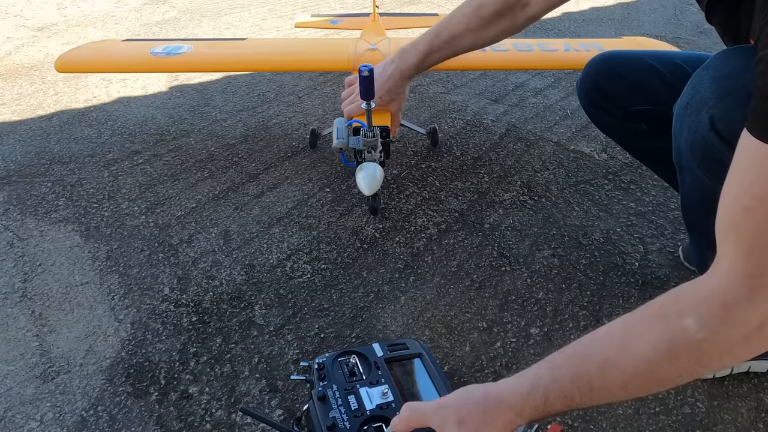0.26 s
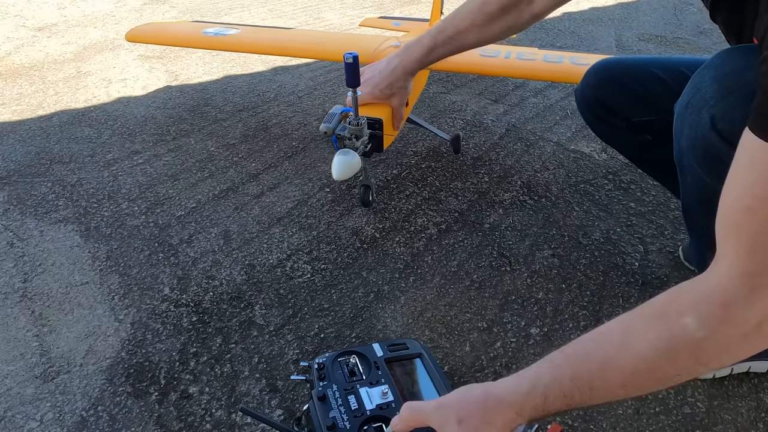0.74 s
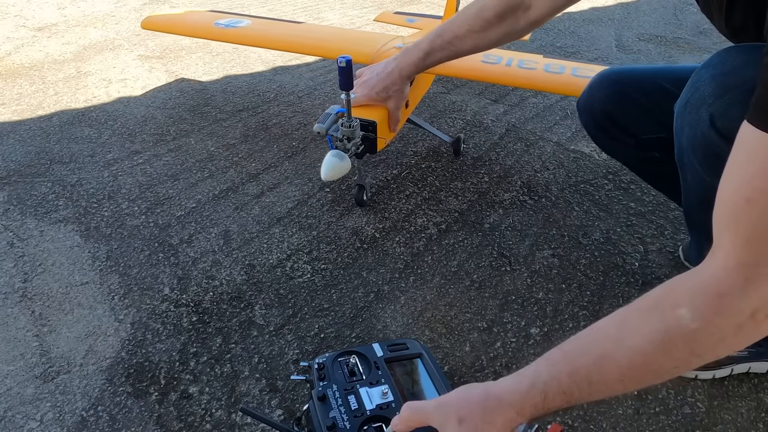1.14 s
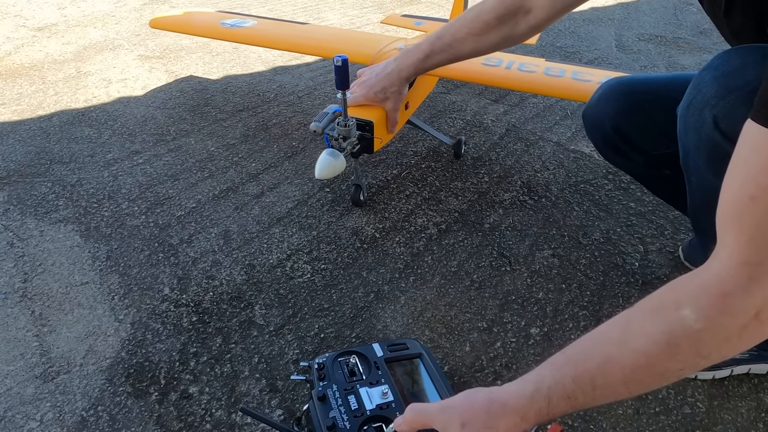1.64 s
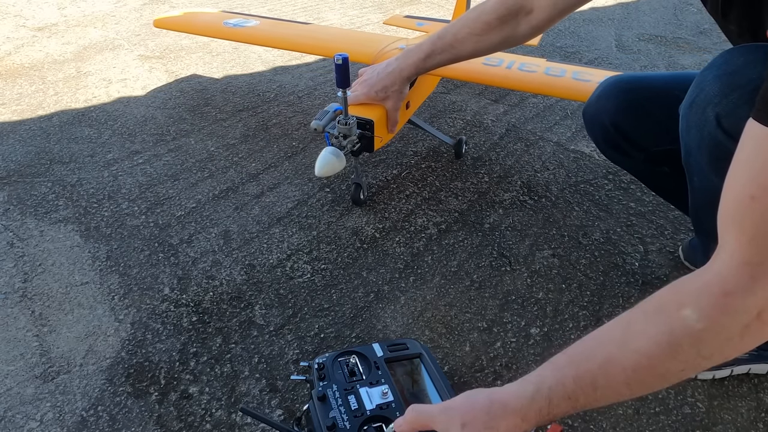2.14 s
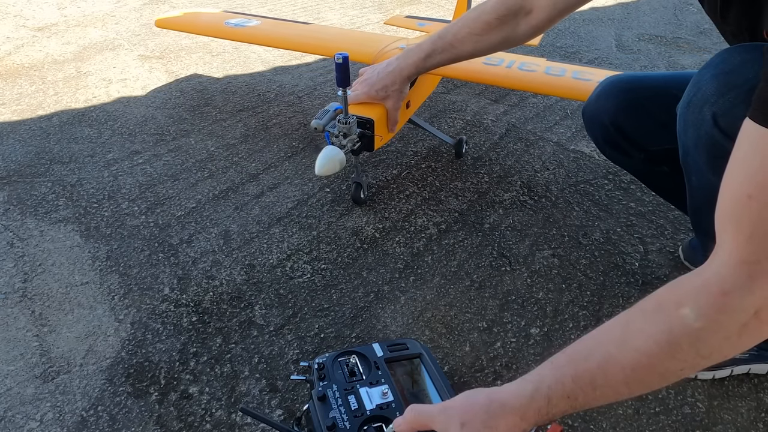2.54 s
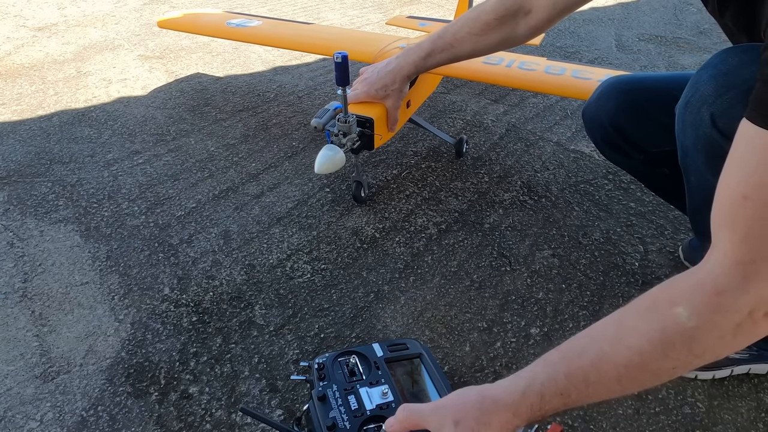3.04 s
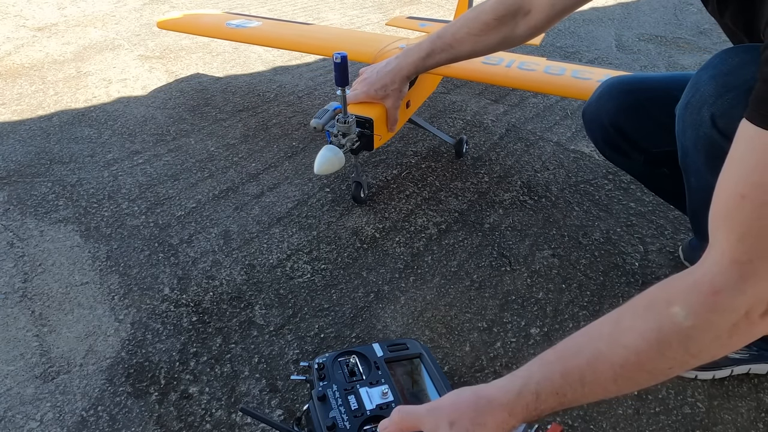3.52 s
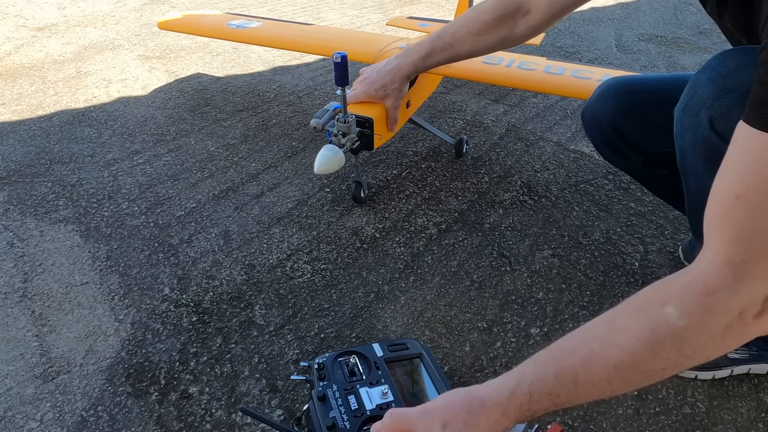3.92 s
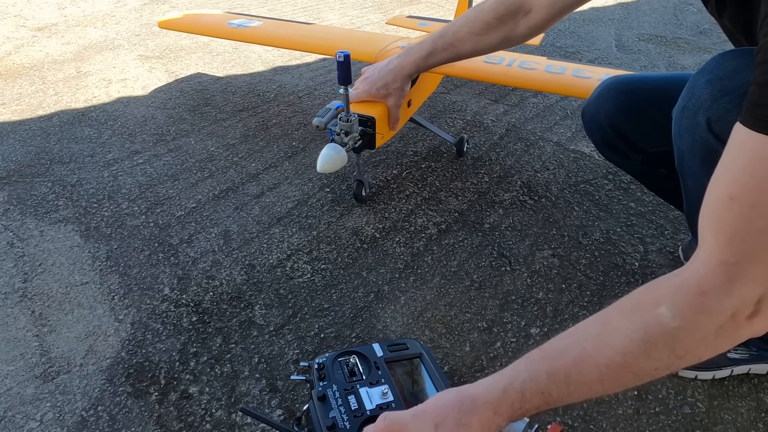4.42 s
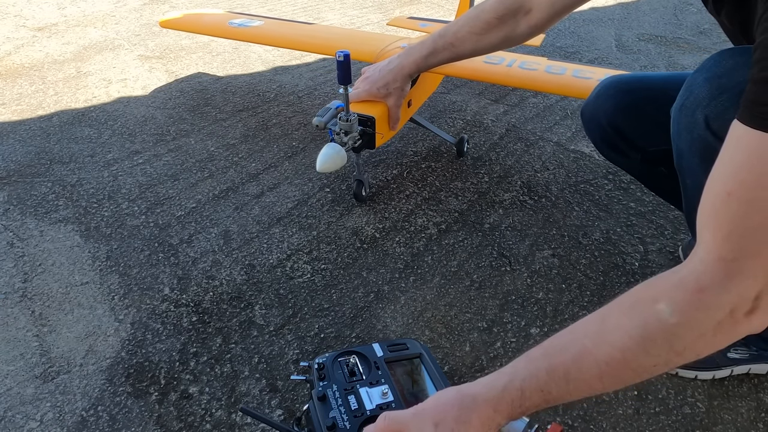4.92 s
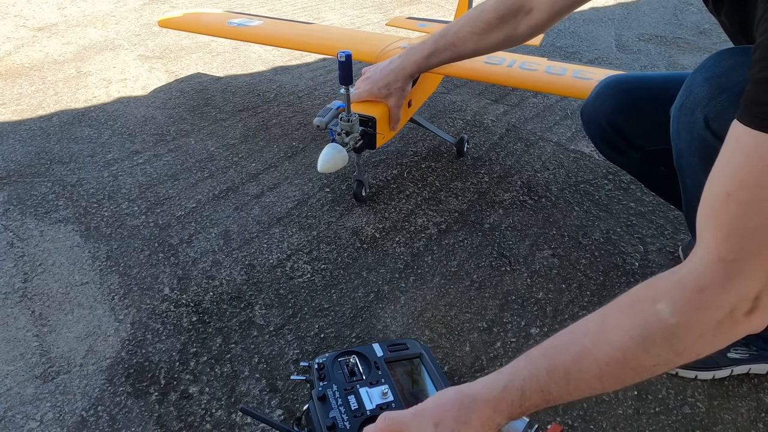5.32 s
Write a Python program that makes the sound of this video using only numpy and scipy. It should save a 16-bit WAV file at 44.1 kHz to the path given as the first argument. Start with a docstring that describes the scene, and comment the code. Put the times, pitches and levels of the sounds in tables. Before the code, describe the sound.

Close outdoors, a tiny engine turns over with a steady whir and scattered pops, fires up, revs sharply, then drops to an uneven buzzing idle.

```python
"""Outdoors on asphalt, a small two-stroke model airplane engine is started close by.
It spins with a steady whir and fires on scattered turns; then it catches, races up and
settles into a rich idle on which every other firing is weak. Firings are struck resonances and
filtered pulses timed by one crank; whir and propeller wash are shaped noise. The propeller
chops the air twice a turn."""
import sys
import numpy as np
from scipy import signal
from scipy.fft import rfft, irfft
from scipy.io import wavfile

SR = 44100
rng = np.random.default_rng(int(sys.argv[2]) if len(sys.argv) > 2 else 0)


def unload_audio(sound):
    """Save the sound as a 16-bit wav file, at the path given as the first command line argument."""
    columns = np.transpose(np.atleast_2d(sound))
    # keep every value between -1 and 1, then stretch to whole-number steps
    steps = np.round(np.clip(columns, -1, 1) * 32767)
    wavfile.write(sys.argv[1], SR, steps.astype(np.int16))


N = 245637
TIME, FREQ = np.arange(N) / SR, np.fft.rfftfreq(N, 1 / SR)
CATCH_S, THROTTLE_BACK_S = 2.862, 4.255

# crank speed from the catch on: [time_s, speed_turns_per_s]
CRANK_SPEED = [(2.862, 78), (2.99, 94.8), (3.12, 117), (3.2, 130.5), (3.28, 141.2), (3.45, 154.8),
               (3.53, 157.5), (3.61, 163.2), (3.64, 163.5), (3.89, 173.7), (3.92, 173.1), (4.09, 180.3),
               (4.16, 182.5), (4.24, 182.5), (4.56, 167.8), (4.7, 169.3), (4.97, 170.8), (5.06, 167.3),
               (5.17, 169.6)]
# lone firings while spinning: [start_s, level_db]
LONE_FIRINGS = [(0.0392,-13.5), (0.0795,-13.5), (0.093,-13.5), (0.144,-14), (0.1832,-14.5), (0.2348,-13),
                (0.273,-14), (0.287,-14), (0.339,-12), (0.3754,-16.6), (0.3896,-12.5), (0.4397,-14),
                (0.491,-15), (0.5424,-14.5), (0.5808,-13), (0.594,-14), (0.6443,-15), (0.6704,-15.5),
                (0.6963,-12.2), (0.7489,-12.5), (0.802,-13.5), (0.8414,-14.5), (0.881,-11.5),
                (0.8948,-15.5), (0.9332,-18), (0.9468,-12.5), (1.011,-14.5), (1.025,-16), (1.078,-13.5),
                (1.1325,-14), (1.1863,-11.7), (1.2241,-16), (1.251,-13), (1.3034,-12.5), (1.342,-13.5),
                (1.355,-19), (1.3809,-13.5), (1.407,-16), (1.458,-11.5), (1.5094,-11.5), (1.5604,-13),
                (1.6,-13), (1.6519,-13), (1.6921,-16), (1.704,-14), (1.7565,-13), (1.796,-14.5),
                (1.8235,-13.5), (1.8763,-12), (1.9306,-11.5), (1.9718,-19), (1.9843,-12.5), (2.037,-12),
                (2.0913,-11), (2.1446,-12.5), (2.1711,-16), (2.2245,-13.5), (2.278,-12.5), (2.3315,-12),
                (2.3712,-19.5), (2.3847,-13), (2.423,-14), (2.463,-14.5), (2.5274,-15.5), (2.5413,-12.5),
                (2.581,-14.7), (2.6076,-13.5), (2.6607,-12.5), (2.7012,-12.5), (2.7147,-15), (2.7686,-13.5),
                (2.8092,-18), (2.8223,-13.5)]
# exhaust pulse spectrum: [freq_hz, gain_db]
EXHAUST_SPECTRUM = [(100, -73.5), (300, -46), (520, -28), (950, -25), (1200, -5), (1550, 6), (1880, -0.5),
                    (2600, 1.5), (3400, -1), (5600, -14), (9000, -26.5), (15500, -31)]
# chopped air and gas spectrum: [freq_hz, gain_db]
CHOP_SPECTRUM = [(200, -69), (600, -40), (1200, -26.5), (2200, 0.5), (3400, 4.5), (4600, 1), (5700, -2.5),
                 (7400, -6), (8700, -6), (13000, -24), (15500, -34)]


def amp(db):
    """Decibels to gain."""
    return 10 ** (np.asarray(db) / 20)


def unit(x):
    """Scales to an rms of one."""
    return x / np.sqrt(np.mean(x ** 2) + 1e-20)


def at(rows, s, axis=1):
    """Reads one column of a curve at the times s."""
    rows = np.asarray(rows)
    return np.interp(s, rows[:, 0], rows[:, axis])


def read(points, hz):
    """Reads a spectrum on a log-frequency axis."""
    f, value = np.transpose(points)
    return np.interp(np.log(hz + 1), np.log(f), value)


def add(mix, s, sound):
    """Mixes a sound in at time s."""
    part = mix[max(round(s * SR), 0):][:len(sound)]
    part += sound[:len(part)]


def high_pass(x, hz, order):
    """Steep cut below hz."""
    return signal.sosfilt(signal.butter(order, hz, "high", fs=SR, output="sos"), x)


def colour(x, db):
    """Causal minimum-phase filter with the gain db at each frequency."""
    log_gain = np.log(amp(np.r_[db, db[:0:-1]]))
    response = np.exp(np.conj(signal.hilbert(log_gain)))[:len(FREQ)]
    taps = irfft(response, N)[None, :4096]
    return signal.oaconvolve(np.atleast_2d(x), taps, axes=1)[:, :N]


def pulses(times, sizes):
    """Band-limited clicks at exact times."""
    out = np.zeros(N)
    index = np.round(times * SR).astype(int)[:, None] + np.arange(-8, 9)
    offset = index - times[:, None] * SR
    click = np.sinc(offset) * np.cos(offset * np.pi / 18) ** 2
    np.add.at(out, np.clip(index, 0, N - 1), sizes[:, None] * click)
    return out


def mode(times, sizes, hz, decay_s, cut_hz=1340):
    """One decaying resonance, struck at the given times, each time at its own pitch."""
    out = np.zeros(N)
    for s, size, f in zip(times, sizes, hz * np.ones(len(times))):
        t = np.maximum(np.arange(SR // 50) / SR + round(s * SR) / SR - s, 0)
        envelope = np.exp(-t / decay_s) * (1 - np.exp(-t * f / 2)) ** 2
        add(out, s, size * envelope * np.sin(2 * np.pi * f * t))
    return high_pass(out, cut_hz, order=4)


def wander(top_hz):
    """Slow random curve of rms one, mostly below top_hz."""
    size = 2048
    hz = np.fft.rfftfreq(size, N / SR / size)
    slow = irfft(rfft(rng.standard_normal(size)) * (hz > .5) / (1 + (hz / top_hz) ** 4))
    return unit(np.interp(TIME, np.linspace(0, N / SR, size), slow))


def richness(s):
    """Share that every other firing loses to a rich mixture at the times s."""
    # weakening by rich mixture: [time_s, share_lost_0_1]
    rich_curve = [(2.98, 0.32), (3.0, 0.7), (3.1, 0.63), (3.2, 0), (3.5, 0), (4.17, 0.18), (4.28, 0.62),
                  (4.6, 0.72)]
    return np.clip(at(rich_curve, s), 0, 1) * (s >= CATCH_S)


def level(law, s, idle_turns_per_s=170):
    """Gain of a layer at the times s, from crank speed and mixture."""
    spinning_db, rise_db, power, rich_db = law
    catch_turns_per_s = CRANK_SPEED[0][1]
    rev = (at(CRANK_SPEED, s) - catch_turns_per_s) / (idle_turns_per_s - catch_turns_per_s)
    rev = np.maximum(rev, 0)
    return amp(spinning_db + rise_db * rev ** abs(power) + rich_db * richness(s))


def crank(surge_turn=0.006, surge_at=0.17, spin_turns_per_s=76):
    """Turns counted from the catch; a rich crank hurries and lags on alternate turns."""
    # before the catch a whole number of turns lies between firings
    s = np.r_[np.array(LONE_FIRINGS)[:, 0], CATCH_S]
    count = np.r_[0, np.cumsum(np.round(np.diff(s) * spin_turns_per_s))]
    spinning = np.interp(TIME, np.r_[0, s], np.r_[-s[0] * spin_turns_per_s, count] - count[-1])
    turns = spinning + np.cumsum(at(CRANK_SPEED, TIME) * (TIME >= CATCH_S)) / SR
    return turns + surge_turn * richness(TIME) * np.sin(np.pi * (turns - surge_at))


def running(turns, uneven_db=0.0, jitter_s=.000015, intake_turn=.545, echo=0.6, echo_s=0.001005,
            sway_s=.00005):
    """An exhaust pulse on every turn and an intake pulse about half a turn later."""
    # intake pulse spectrum: [freq_hz, gain_db]
    intake_spectrum = [(300, -74.5), (650, -34), (1000, -12), (1250, -6.5), (1850, 5), (2600, -2.5),
                       (4200, -20), (6000, -17), (9000, -36), (15500, -78)]
    # layer gains: [spinning_db, rise_at_idle_db, rise_power, fully_rich_db]
    buzz_law = (-26.5, 0, 3, 0)
    intake_law = (-21.5, 11, 1, 15)
    ring_law = (-13.5, -2, -0.5, 3)
    count = np.arange(int(turns[-1]))
    chance = rng.standard_normal((len(count), 4))
    s = np.interp(count, turns, TIME)
    # the beat changes step as the throttle closes
    weak = richness(s) * (count % 2 == (s > THROTTLE_BACK_S))
    strength = (1 - weak) * amp(uneven_db * chance[:, 0])
    fired = s + jitter_s * chance[:, 1] + .00008 * weak  # weak firings leave the pipe later
    drawn = np.interp(count + intake_turn, turns, TIME) + jitter_s * chance[:, 2]
    # the pulse comes back once, its delay swaying slightly as the held plane shakes
    returned = fired + echo_s + sway_s * np.interp(s, TIME, wander(9.1))
    blows = pulses(fired, strength) + echo * pulses(returned, strength)
    exhaust = colour(blows, read(EXHAUST_SPECTRUM, FREQ))
    gulps = pulses(drawn, level(intake_law, s) * amp(chance[:, 3]))
    buzz = exhaust + colour(gulps, read(intake_spectrum, FREQ))
    buzz = buzz / buzz[:, TIME > CATCH_S].std() * level(buzz_law, TIME)
    return buzz + can(fired, strength) + muffler(fired, strength * level(ring_law, s))


def muffler(times, sizes, open_turn=0.1553, start_hz=2620, end_hz=2190, sag_s=0.0015, scatter=0.0065,
            overtone_db=-17, whistle_s=0.0013, split=0.032, close_s=0.00067, whistle_scatter=0.0071):
    """Each firing blows a short falling note while the port is open, then a whistle from the outlet."""
    # whistle, rising with hotter gas, sinking as the throttle closes; level against the note:
    # [time_s, pitch_hz, level_db]
    whistle_curve = [(2.8, 6080, -17), (2.9, 6080, -16.5), (3.05, 6280, -9.5), (3.3, 6420, -7),
                     (3.6, 6490, -9), (4.1, 6740, -9.5), (4.245, 6840, -8.5), (4.27, 6466, -11)]
    out = np.zeros(N)
    for s, size, chance in zip(times, sizes, rng.standard_normal((len(times), 4))):
        t = np.maximum(np.arange(400) / SR + round(s * SR) / SR - s, 0)
        hz = (end_hz + (start_hz - end_hz) * np.exp(-t / sag_s)) * (1 + scatter * chance[0])
        shut = np.maximum(t - open_turn / at(CRANK_SPEED, s), 0)
        port = (1 - np.exp(-(t / .0008) ** 2)) * np.exp(-shut / close_s)
        phase = 2 * np.pi * np.cumsum(hz * np.gradient(t))
        overtone = amp(overtone_db + 2 * chance[1]) * np.sin(1.633 * phase)
        note = port * (np.sin(phase) + overtone)
        age = t / whistle_s
        cycles = at(whistle_curve, s) * (1 + whistle_scatter * chance[2]) * t
        # with the throttle closed the whistle splits into two neighbouring tones
        beat = np.sin(2 * np.pi * split * cycles) if s > THROTTLE_BACK_S else 1
        whistle = age * np.exp(1 - age) * np.sin(2 * np.pi * cycles) * beat
        whistle_gain = amp(at(whistle_curve, s, axis=2) + 2 * chance[3])
        add(out, s, size * (note + whistle_gain * whistle))
    return high_pass(out, 550, order=4)


def can(times, sizes, upper_decay_s=0.0015, upper_drift=.03, settle_s=0.61):
    """Muffler can hums at its main mode under drifting upper ones; a lower one joins at idle."""
    # main mode, humming on between firings in hot gas: [time_s, pitch_hz, level_db]
    main_mode = [(3.1, 2170, -42), (3.3, 2230, -21), (3.55, 2210, -19), (3.8, 2200, -24), (4.15, 2200, -32),
                 (4.3, 2480, -26), (4.6, 2470, -46)]
    # upper mode rasping as the throttle opens: [time_s, pitch_hz, level_db]
    rasp = [(2.98, 3300, -34), (3.15, 3520, -9), (3.35, 3440, -20), (3.55, 3100, -45)]
    # upper modes, drifting with the gas: [centre_hz, level_db]
    upper_modes = [(2900, -29), (3500, -21.5), (4130, -16), (4520, -21), (4900, -39)]
    # upper mode gain: [spinning_db, rise_at_idle_db, rise_power, fully_rich_db]
    upper_law = (-17.5, 15, -0.3, 0.5)
    settled = np.clip((times - THROTTLE_BACK_S) / settle_s, 0, 1)
    out = mode(times, sizes * amp(at(main_mode, times, axis=2)), at(main_mode, times), decay_s=0.0035)
    rasp_sizes = sizes * amp(at(rasp, times, axis=2))
    out += mode(times, rasp_sizes, at(rasp, times), upper_decay_s, cut_hz=2000)
    for hz, db in upper_modes:
        drift = 1 + upper_drift * np.interp(times, TIME, wander(5.6))
        upper_sizes = sizes * level(upper_law, times) * amp(db)
        out += mode(times, upper_sizes, hz * drift, upper_decay_s, cut_hz=hz / 2)
    return out + mode(times, sizes * settled * amp(-24.5), hz=1843, decay_s=0.0036)


def sputter(thump_db=10.5, scatter=0.016, puff_db=-22, puff_hz=700, gas_db=-8, gas_s=0.0013, pop_db=0.43):
    """Lone firings: pressure step, low puff, spit of gas and a muffler ring slightly off in pitch."""
    s, db = np.transpose(LONE_FIRINGS)
    blows = pulses(s, amp(db))
    age = np.arange(SR // 50) / SR / gas_s
    spit = signal.oaconvolve(blows, age * np.exp(1 - age))[:N]
    gas = amp(gas_db) * colour(air() * spit, read(CHOP_SPECTRUM, FREQ))
    thump = amp(thump_db) * colour(blows, read(EXHAUST_SPECTRUM, FREQ))
    puff = mode(s, amp(db + puff_db), puff_hz, .5 / puff_hz, cut_hz=puff_hz)
    return muffler(s, amp(db + pop_db), scatter=scatter) + thump + puff + .5 * gas


def drone(turns):
    """Smooth low exhaust partials; half orders and a fuller middle come in while firings alternate."""
    # low partials: [crank_speed_multiple, level_db]
    whole_orders = [(1, -30), (3, -11), (4, -6.5), (5, 2.5)]
    # partials that come out when rich: [crank_speed_multiple, level_db]
    half_orders = [(3.5, -63), (4.5, -66), (5.5, -63), (7, -43.5), (8.5, -40), (9.5, -42)]
    # whole-order gain: [spinning_db, rise_at_idle_db, rise_power, fully_rich_db]
    drone_law = (-73, 17.5, 4, -19.5)
    whole = sum(amp(db) * np.sin(2 * np.pi * round(k) * turns) for k, db in whole_orders)
    half = sum(amp(db) * np.sin(np.pi * round(2 * k) * turns) for k, db in half_orders)
    half_gain = richness(TIME) * np.clip(TIME - CATCH_S, 0, 1)
    return (TIME > CATCH_S) * (level(drone_law, TIME) * whole + half_gain * half)


def propeller(turns, hiss_db=7.5, sharpness=2.3, between=1.0, lag_turn=0.093, slap_db=3.5,
              slap_uneven_db=1.5, tone_db=-74, dip_db=-3, dip_hz=3400):
    """Each passing blade gives a slap and a burst of hiss over the faint tone of the blades."""
    # hiss and slap gain: [spinning_db, rise_at_idle_db, rise_power, fully_rich_db]
    chop_law = (-44.5, 13, 0.56, -1.5)
    spectrum = read(CHOP_SPECTRUM, FREQ)
    gate = between + np.exp(sharpness * (np.cos(4 * np.pi * (turns - lag_turn)) - 1))
    dip = dip_db * np.exp(-np.log2((FREQ + 1) / dip_hz) ** 2)  # the slaps rule the middle range
    hiss = colour(unit(colour(air() * gate, spectrum)), dip)
    passes = np.interp(np.arange(int(2 * turns[-1])) / 2 + lag_turn, turns, TIME)
    slap_sizes = amp(slap_uneven_db * rng.standard_normal(len(passes)))
    slap = colour(pulses(passes, slap_sizes), spectrum - 2.04 * FREQ / 1000)
    slap = slap + 0.59 * np.roll(slap, round(0.00064 * SR))  # the bounce off the cowl and ground
    slap = slap / slap[:, TIME > CATCH_S].std()
    thrust = np.clip((TIME - CATCH_S) / 0.24, 0, 1)
    # tone_db holds at 170 turns per s
    tone = amp(tone_db) * (np.gradient(turns) * SR / 170) ** 3 * np.sin(4 * np.pi * turns)
    return thrust * level(chop_law, TIME) * (amp(hiss_db) * hiss + amp(slap_db) * slap) + tone


def clatter(turns, loose_turn=0.0258, fade_s=0.34, uneven_db=3, scatter=0.067):
    """Struck resonances on every slow turn, lost as the engine races up."""
    # port puff, intake gulp, piston knock: [place_turn_0_1, pitch_hz, decay_s, level_db]
    strokes = [(.6, 724, .0007, -38), (.72, 1363, 0.0013, -22), (.9, 5360, 0.00095, -26.5)]
    out = np.zeros(N)
    count = np.arange(np.ceil(turns[0]), at(CRANK_SPEED, CATCH_S + fade_s) * fade_s)
    for place, hz, decay_s, db in strokes:
        chance = rng.standard_normal((len(count), 3))
        s = np.interp(count + place + loose_turn * chance[:, 0], turns, TIME)
        sizes = amp(db + uneven_db * chance[:, 1]) * np.clip(1 - (s - CATCH_S) / fade_s, 0, 1)
        out += mode(s, sizes, hz * (1 + scatter * chance[:, 2]), decay_s, cut_hz=0.71 * hz)
    return out


def whir(turns, throb=0.2):
    """Rushing noise of the spinning parts, throbbing with each turn."""
    # whir spectrum: [freq_hz, gain_db]
    whir_spectrum = [(100, -70.5), (430, -41), (700, -23.5), (1200, -8), (1520, 0.5), (1850, -5.5),
                     (2350, -0.5), (4000, -5), (6000, -14.5), (9000, -20), (15500, -39)]
    # airframe resonances: [centre_hz, width_hz, boost_db]
    airframe = [(3183, 235, 5.5), (5250, 180, 6.5)]
    # whir gain: [spinning_db, rise_at_idle_db, rise_power, fully_rich_db]
    whir_law = (-28.5, -4.5, 3.5, 2.5)
    db = read(whir_spectrum, FREQ)
    for hz, width, peak in airframe:
        db = db + peak * np.exp(-((FREQ - hz) / (width / 2)) ** 2 / 2)
    gate = 1 + throb * np.cos(2 * np.pi * (turns - .85))
    return level(whir_law, TIME) * unit(colour(air() * gate, db))


def air():
    """White turbulence, less alike at the two microphone ports in the treble."""
    # likeness of the two ports: [freq_hz, likeness_0_1]
    likeness = [(300, 1), (2000, 0.96), (5000, 0.66), (9000, 0.82), (13000, 0.26)]
    a, b = rfft(rng.standard_normal((2, N)))
    same = np.clip(read(likeness, FREQ), 0, 1)
    common, apart = a * np.sqrt((1 + same) / 2), b * np.sqrt((1 - same) / 2)
    return irfft(np.array([common + apart, common - apart]), N)


def yard(x, wet_db=-10):
    """Ground, wing and a kneeling person scatter a short, thin tail of sparse echoes."""
    t = np.arange(SR // 5) / SR
    sparse = rng.standard_normal((2, len(t))) * (rng.random((2, len(t))) < .1)
    taps = sparse * (t > .002) * amp(-60 * t / .045)
    taps /= np.linalg.norm(taps, axis=1, keepdims=True)
    return x + amp(wet_db) * signal.oaconvolve(x, taps + .5 * taps[::-1], axes=1)[:, :N]


def scene(flutter_db=0.73):
    """All sources follow one crankshaft; the air noise flutters in the wash of the propeller."""
    turns = crank()
    rush = (whir(turns) + propeller(turns)) * amp(flutter_db * wander(24))
    return yard(sputter() + clatter(turns) + running(turns) + drone(turns)) + rush


def record(dry):
    """Two ports with own colour and delay, the nose swinging left, a bass cut, then the band limit."""
    # port level difference: [freq_hz, left_minus_right_db]
    tilt = [(160, 0), (740, -0.5), (3300, 2), (9000, 0), (15000, -5)]
    # port phase difference: [freq_hz, left_lead_rad]
    lead = [(0, 0), (5600, -0.51), (6630, -1.48), (8610, -0.83), (11100, -1.6), (12800, -0.5),
            (15200, -2.8)]
    side = np.array([[.5], [-.5]])
    response = amp(side * read(tilt, FREQ)) * np.exp(1j * side * read(lead, FREQ))
    ports = irfft(rfft(dry) * response, N)
    swing_db = np.interp(TIME, [0, 2, 5], [-1.1, -.1, .3])  # left minus right
    ports = high_pass(ports * amp(side * swing_db), 154, order=4)
    band_limit = signal.firwin(511, 15700, window=("kaiser", 9), fs=SR)
    return signal.oaconvolve(ports, band_limit[None], "same")


dry = scene()
out = record(dry)
unload_audio(out)
```